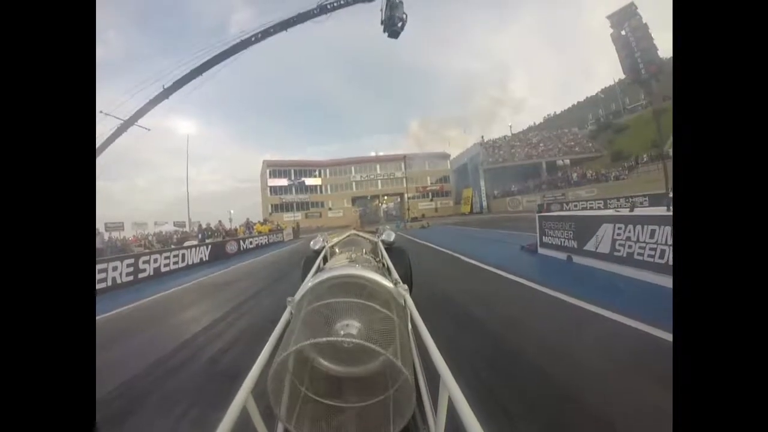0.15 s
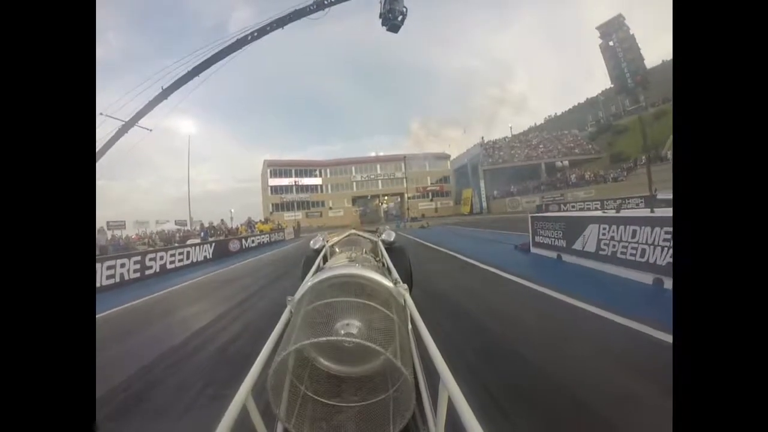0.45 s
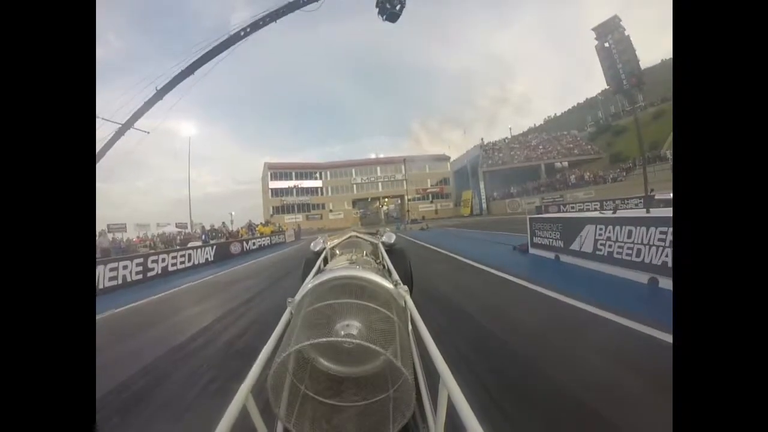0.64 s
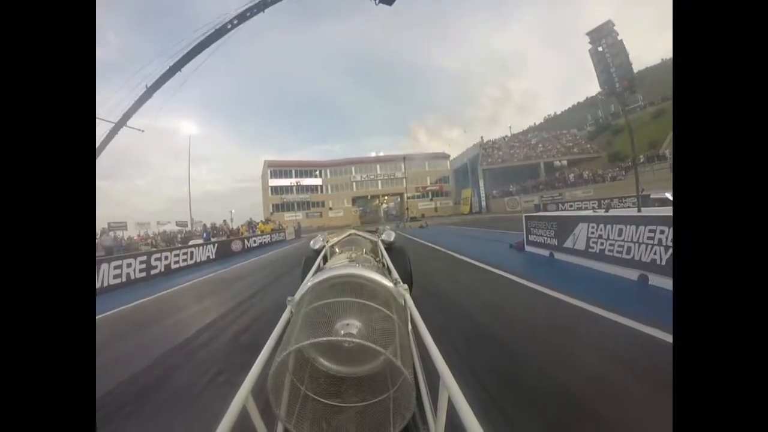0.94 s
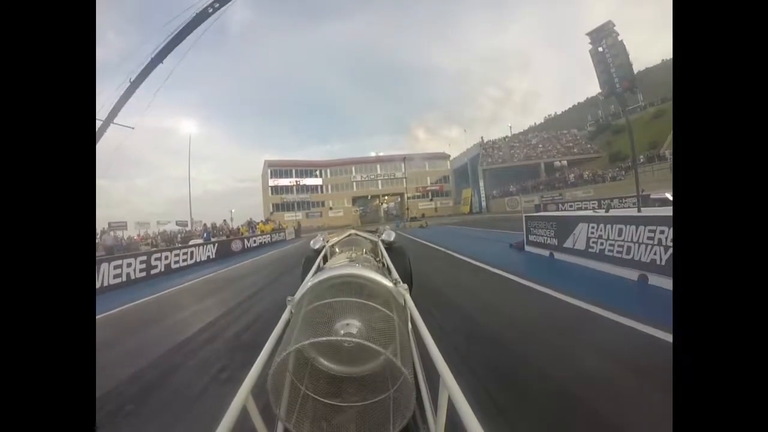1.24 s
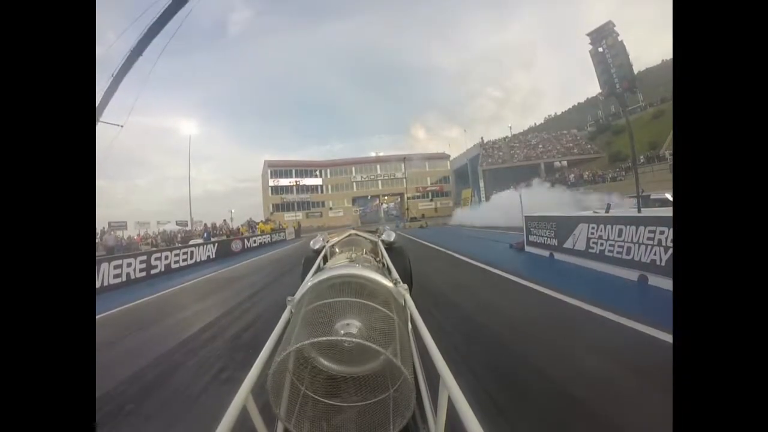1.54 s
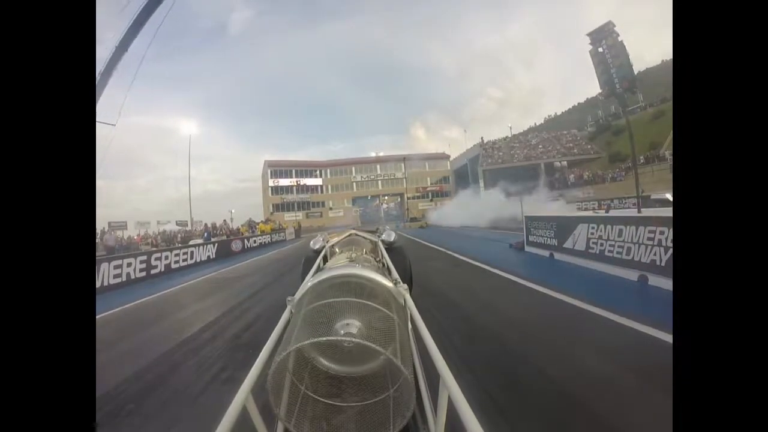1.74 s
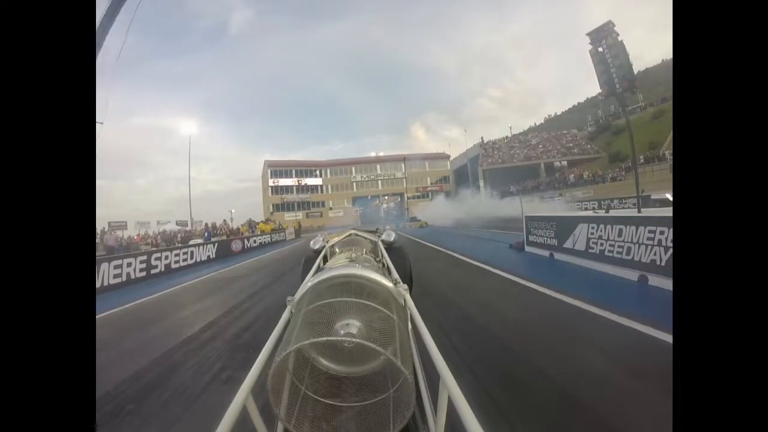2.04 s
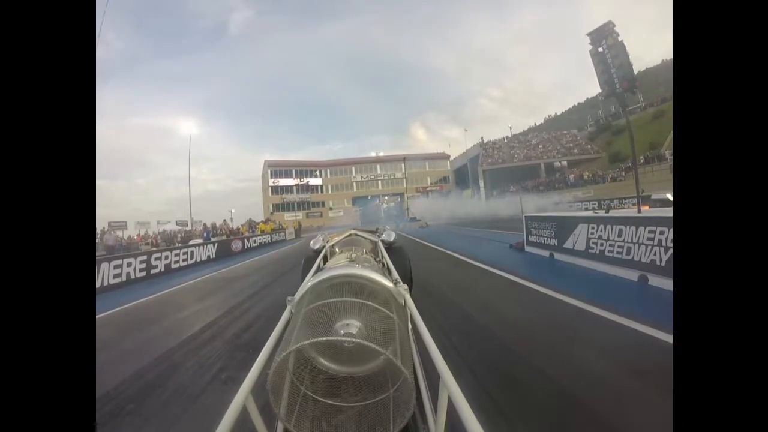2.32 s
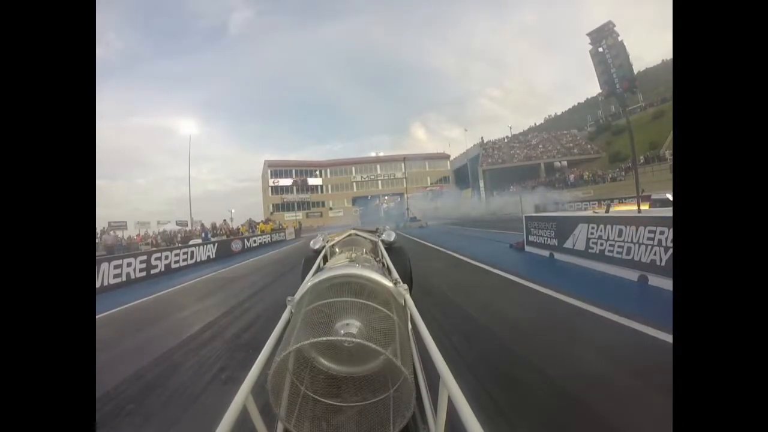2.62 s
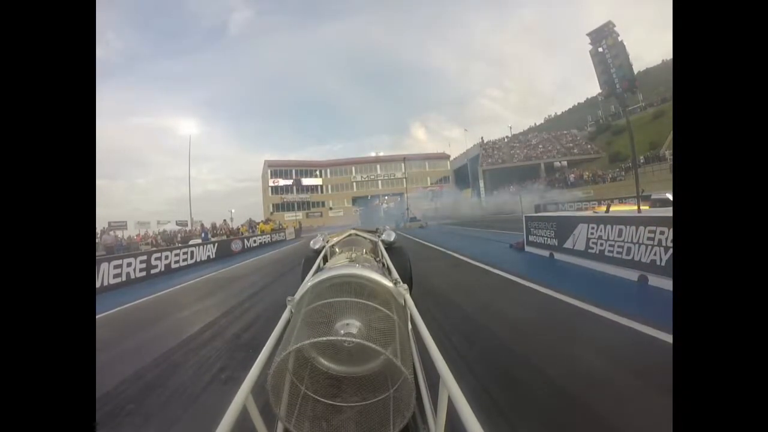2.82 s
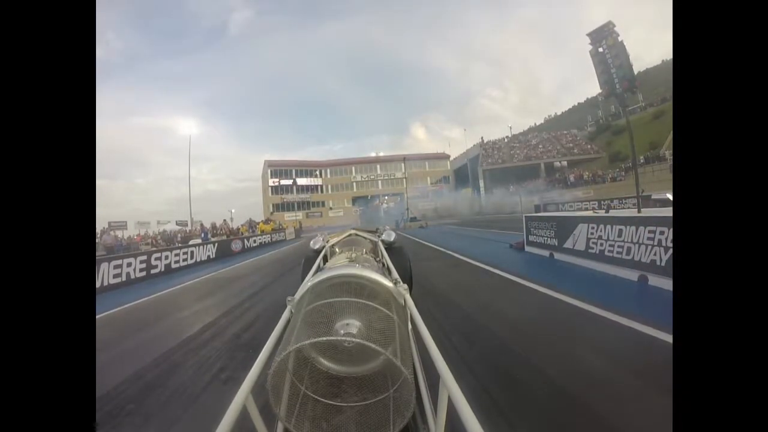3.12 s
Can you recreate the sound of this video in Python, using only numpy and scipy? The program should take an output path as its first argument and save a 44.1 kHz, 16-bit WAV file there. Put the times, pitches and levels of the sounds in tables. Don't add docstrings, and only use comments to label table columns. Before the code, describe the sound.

A jet car engine runs continuously, very close: a strong hum around 225 Hz, fluttering shrill whine near 5.4 kHz, and bright duct roar. Its pitch dips slightly around 0.4 and 0.9 seconds, then rises and steadies. Another jet pops loudly at 0 and 0.7, softly with long ringing at 0.3, and shorter, higher at 1.6, echoing outdoors. Its faint whistle sags until 1.0, fading by 1.5; low rumble continues.

```python
import sys
import numpy as np
from scipy import signal
from scipy.fft import rfft, irfft, next_fast_len
from scipy.io import wavfile
from scipy.ndimage import uniform_filter1d, map_coordinates

SR = 44100
rng = np.random.default_rng(int(sys.argv[2]) if len(sys.argv) > 2 else 0)


def unload_audio(sound):
    columns = np.transpose(np.atleast_2d(sound))
    steps = np.round(np.clip(columns, -1, 1) * 32767)
    wavfile.write(sys.argv[1], SR, steps.astype(np.int16))


def gain_from_db(level_db):
    decades = np.asarray(level_db, float) / 20
    return 10 ** decades


N = 144207
T = np.arange(N) / SR

# time in seconds, pitch in Hz, level in dB.
WHISTLE = [(0, 1000, -46), (.17, 985, -41), (.26, 972, -32), (.36, 950, -41), (.47, 925, -32),
           (.58, 912, -31.5), (.7, 895, -40), (1.0, 880, -46), (1.2, 895, -38), (1.42, 910, -38),
           (1.5, 915, -60)]
# start in seconds, thump level in dB, thump pitch in Hz,
# time for the thump to fall 60 dB in seconds, level of the rolling echoes in dB.
POPS = [
    (.005, -11, 38.9, 0.73, -17),
    (0.301, -23, 40.16, 2.4, -22),
    (0.692, -13, 39.6, 0.84, -18.5),
    (1.64, -20.5, 71, 0.32, -24),
]
# frequency in Hz, level in dB.
ROLL_COLOUR = [(40, -6), (120, -2.5), (300, -7), (700, -12), (1700, -13.5), (2600, -14.5), (4000, -45)]
# time in seconds, blades passing per second in Hz.
BLADE_SPEED = [(0, 5443), (.1, 5333), (.25, 5330), (.39, 5234), (.55, 5337), (.67, 5390), (.78, 5320),
               (.9, 5255), (1.05, 5330), (1.25, 5406), (1.42, 5468), (1.7, 5513), (2.0, 5528), (2.3, 5515),
               (2.6, 5502), (2.9, 5462), (3.27, 5450)]
# time in seconds, level in dB.
HUM = [(0.0, -10), (0.07, -33), (0.12, -15.5), (0.19, -13.5), (0.71, -11), (0.76, -19.5), (0.79, -13.5),
       (1.26, -15), (1.35, -18), (1.64, -11.5), (2.26, -10.5), (2.49, -12.5), (2.72, -12.5), (2.82, -14.5),
       (3.24, -13), (3.27, -14)]
# time in seconds, air flow level in dB, blade whine level in dB.
FLOW = [(0.0, -29.5, -20.5), (0.11, -32, -13), (0.16, -33.5, -21.5), (0.21, -32, -13), (0.45, -31, -21.5),
        (0.49, -31, -15), (0.7, -30.5, -19.5), (0.79, -35.5, -16), (0.81, -34, -21), (1.14, -33, -15),
        (1.17, -33.5, -18.5), (1.41, -29.5, -18.5), (2.04, -31.5, -16), (2.07, -30.5, -21.5),
        (2.42, -32, -15), (2.73, -29.5, -23), (2.79, -30.5, -16.5), (3.27, -29, -15)]
# multiple of the shaft speed, level over the air flow at full
# speed in dB, level change in dB per Hz of shaft speed (its sign is ignored).
UNEVEN = [(3, -13.5, 0.8), (7, -11, -2.5), (10, -5.5, 0.4), (11, -27, 5), (12, -2, .2), (13, 0, 0.5),
          (14, 6.5, 1.2), (17, -14.5, 1), (18, -12.5, 0.5), (20, -7, .5), (21, -16, 1.1), (22, -10, .6),
          (26, -29, 5), (28, -22, -2), (30, -15, 1), (31, -16, 0), (34, -20, .3), (38, -19, 1),
          (41, -18, 2)]
# frequency in Hz, level of each 1 Hz slice in dB.
AIR_COLOUR = [(35, -66), (60, -25), (170, -18), (230, -8), (384, -31.5), (3240, -19), (4810, -32.5),
              (5530, -27), (15300, -44)]
# frequency in Hz, width in Hz, boost in dB.
DUCT = [(1660, 580, 3), (2125, 63, -8.5), (2230, 120, 4.5), (3256, 166, 8.5), (4150, 90, 1.5),
        (4575, 140, 10), (4820, 150, -13), (2533, 126, -6.5), (5250, 350, 14.5), (7790, 230, 8.5),
        (8740, 180, 5.5), (10850, 670, 12.5), (12500, 480, 1), (13400, 400, 9)]


def unit(x):
    return x / np.sqrt(np.mean(abs(x) ** 2) + 1e-20)


def along(points, hz):
    f, value = np.transpose(points)
    return np.interp(np.log(hz + 1), np.log(f + 1), value)


def curves(rows, smooth_s=0.01):
    times, *columns = np.transpose(rows)
    size = int(smooth_s * SR) + 1
    return [uniform_filter1d(np.interp(T, times, c), size, mode="nearest") for c in columns]


def noise(gain):
    m = next_fast_len(N + 8192)
    spectrum = rfft(rng.standard_normal(m)) * gain(np.fft.rfftfreq(m, 1 / SR))
    return unit(irfft(spectrum, m)[:N])


def wobble(rate):
    return map_coordinates(rng.standard_normal(int(N * rate / SR) + 4), [T * rate])


def flutter(hz):
    low = lambda f: (1 + (f / hz) ** 2) ** -.68
    return (noise(low) + 1j * noise(low)) / np.sqrt(2)


def far_whistle():
    hz, db = curves(WHISTLE)
    phase = 2 * np.pi * np.cumsum(hz) / SR + .7 * wobble(20)
    return gain_from_db(db + 1.5 * wobble(14)) * np.sqrt(2) * np.sin(phase)


def far_rumble():
    return gain_from_db(-41.5 + 1.8 * wobble(3.75)) * noise(lambda f: f / (12 + abs(f - 40) ** 2))


def pop_thump(t, db, hz, t60):
    twin_hz, twin_share = hz - 4.2, 0.27
    slap_db, slap_hz, slap_t60 = -3, 115, 0.14
    tones = np.sin(2 * np.pi * hz * t) + twin_share * np.sin(2 * np.pi * twin_hz * t)
    ring = gain_from_db(db - 60 * t / t60) * (1 - np.exp(-t / 0.002)) * tones
    slap = gain_from_db(db + slap_db - 60 * t / slap_t60) * np.sin(2 * np.pi * slap_hz * t)
    return np.sqrt(2) * (ring + slap)


def pop_roll(t, db):
    rise_s, hold_s, t60 = 0.0081, .1, 1
    fall_db = -25 * t - 60 * np.maximum(t - hold_s, 0) / t60
    shape = (1 - np.exp(-t / rise_s)) * gain_from_db(fall_db)
    return gain_from_db(db + 1.2 * wobble(45)) * shape * noise(lambda f: gain_from_db(along(ROLL_COLOUR, f)))


def burner_pops():
    out = np.zeros(N)
    for start, thump_db, hz, t60, roll_db in POPS:
        t = np.maximum(T - start, 0)
        out += pop_thump(t, thump_db, hz, t60) + pop_roll(t, roll_db)
    return out


def duct_roar(turn):
    def gain(f):
        db = along(AIR_COLOUR, f)
        for hz, width, boost_db in DUCT:
            db = db + boost_db / (1 + ((f - hz) / width) ** 2)
        return gain_from_db(db)

    chop = 1 + 0.13 * np.sin(turn)
    return noise(gain) * chop * gain_from_db(11 + 0.4 * wobble(5) + .4 * wobble(20))


def shaft_hum(turn):
    level = gain_from_db(curves(HUM)[0] + 0.61 * wobble(18))
    return level * np.sqrt(2) * np.sin(turn + 0.073 * wobble(25.2))


def uneven_blades(turn, shaft_hz):
    full_hz = 229
    out = np.zeros(N)
    for multiple, db, grow in UNEVEN:
        level = gain_from_db(db + abs(grow) * (shaft_hz - full_hz) + 2.1 * wobble(14))
        out += level * np.sin(multiple * turn + rng.uniform(0, 7.57) + .5 * wobble(12))
    return out


def blade_tone(blade_turn, k):
    steady, flutter_hz, skirt_hz, skirt_db = 0.87, 19, 83, -4
    core = steady + (1 - steady ** 2) ** .5 * flutter(k * flutter_hz)
    fade = unit(core + gain_from_db(skirt_db) * flutter(k * skirt_hz))
    return np.real(fade * np.exp(1j * k * blade_turn))


def engine():
    blades = 24
    shaft_hz = curves(BLADE_SPEED, smooth_s=0.0607)[0] / blades
    turn = 2 * np.pi * np.cumsum(shaft_hz) / SR
    flow_db, whine_db = curves(FLOW)
    whine = gain_from_db(whine_db) * blade_tone(blades * turn, 1)
    octave = gain_from_db(1) * blade_tone(blades * turn, 2)
    flow_tones = gain_from_db(flow_db) * (uneven_blades(turn, shaft_hz) + octave)
    roar = gain_from_db(flow_db) * duct_roar(turn)
    return shaft_hum(turn) + np.sqrt(2) * (flow_tones + whine) + roar


def scene():
    return (far_whistle() + far_rumble() + burner_pops() + engine())[None]


def roll_off(x):
    return signal.sosfilt(signal.butter(12, 15490, fs=SR, output="sos"), x)


def record(dry):
    clip_top, top_hz = 1.07, 15170
    clipped = dry / (1 + abs(dry / clip_top) ** 6) ** (1 / 6)
    keep = np.clip((top_hz - np.fft.rfftfreq(N, 1 / SR)) / 120 + 1, 0, 1)
    mix = irfft(rfft(clipped) * keep, N)
    return roll_off(mix)


dry = scene()
out = record(dry)
unload_audio(out)
```